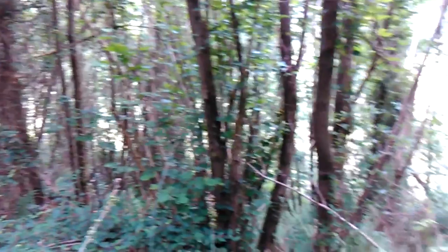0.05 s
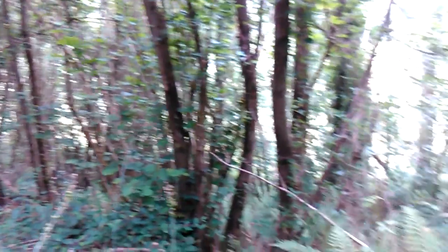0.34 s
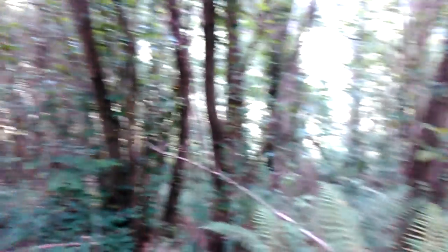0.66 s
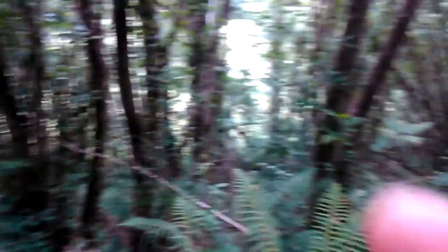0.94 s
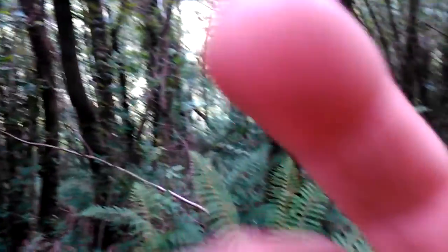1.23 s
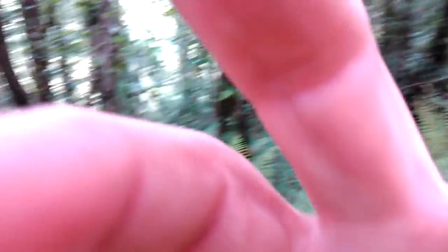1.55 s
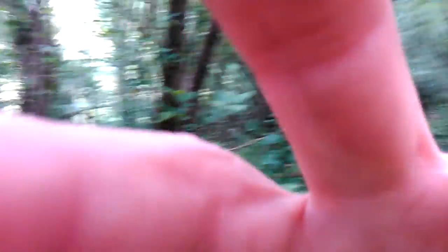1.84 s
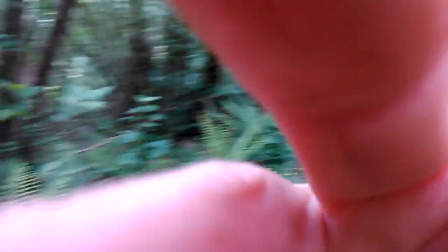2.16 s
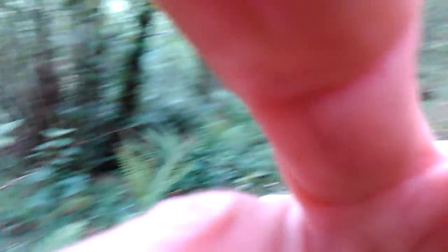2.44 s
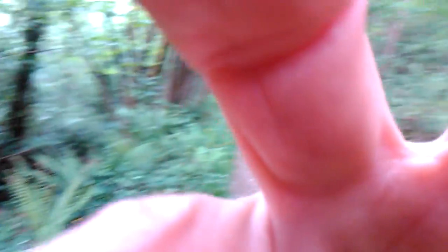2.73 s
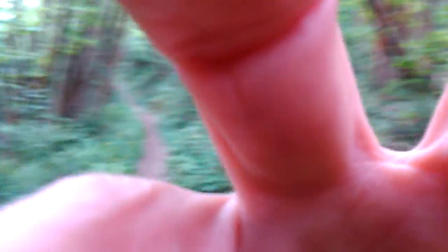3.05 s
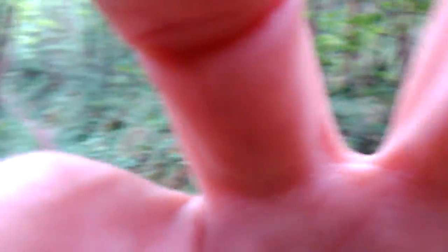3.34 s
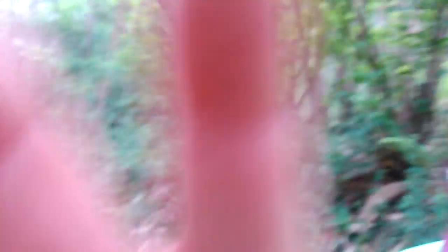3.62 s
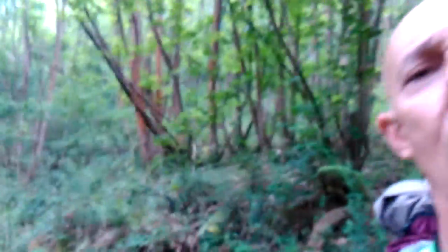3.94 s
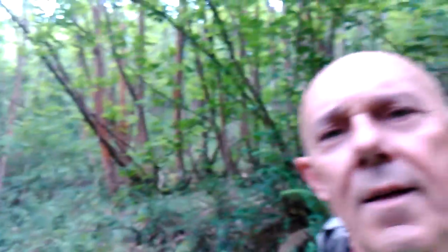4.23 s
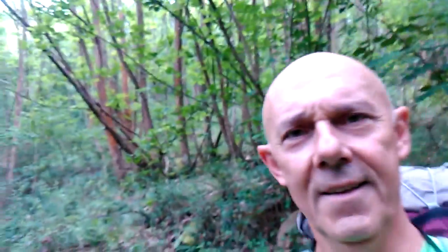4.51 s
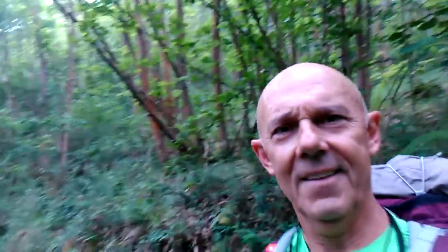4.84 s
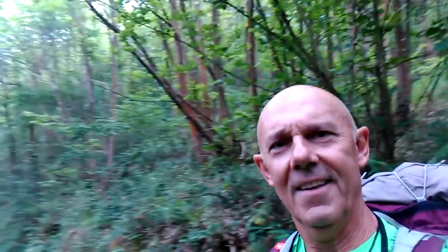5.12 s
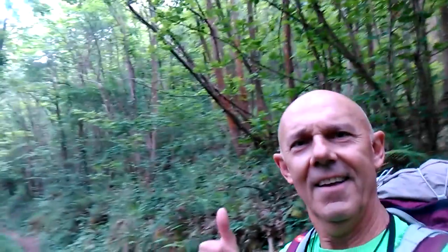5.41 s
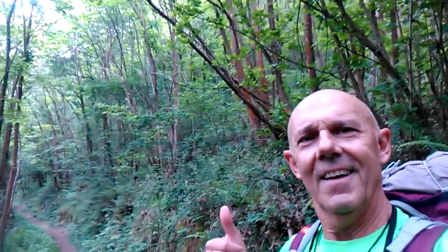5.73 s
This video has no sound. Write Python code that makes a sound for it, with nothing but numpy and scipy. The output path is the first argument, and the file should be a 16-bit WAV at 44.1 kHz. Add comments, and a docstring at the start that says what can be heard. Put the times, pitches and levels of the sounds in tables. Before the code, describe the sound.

In a quiet wood, a small camera is turned in the hand. Deep rumbling and soft thumps hit the microphone first, then uneven skin rubbing and plastic clicks that build to a short cluster of loud snaps. Behind this, birds chirp in thin, buzzy, gliding notes. As the handling fades to light touches, lower whistles come through a soft hush. A faint hum swells whenever the sound gets loud.

```python
"""In a wood where songbirds call, a small camera is turned round in the hand.
Right at the microphone, fingers rub and thump on its hollow plastic case, and the plastic clicks.
The birds sing gliding notes, high and buzzy or lower and clearer, that echo off the trees.
On loud sounds a noise suppressor opens: a faint hum comes up, and the hush of the wood lifts a little."""
import sys
import numpy as np
from scipy import signal
from scipy.fft import rfft, irfft
from scipy.io import wavfile
from scipy.ndimage import uniform_filter1d

SR = 44100
rng = np.random.default_rng(int(sys.argv[2]) if len(sys.argv) > 2 else 0)


def file_out(sig):
    """Save sig as 16-bit WAV at sys.argv[1]."""
    # one column per channel
    cols = np.atleast_2d(sig).T
    # limit, then scale
    lim = np.clip(cols, -1, 1)
    pcm = np.round(lim * 32767).astype(np.int16)
    wavfile.write(sys.argv[1], SR, pcm)


N = 258867
TIME, FREQS_HZ = np.arange(N) / SR, np.fft.rfftfreq(N, 1 / SR)
TREBLE_LIMIT_HZ = 16300


def finger_friction():
    """Skin drags on the case: a rumble, a rub and a hiss all follow one uneven finger pressure."""
    # finger strokes, with relative levels: start_s, length_s, rumble_db, rub_db, hiss_db
    strokes = [(0.209, 0.6, -26.5, -54, -88), (0.78, 0.25, -31.5, -61.5, -73.5),
               (0.945, 0.11, -44, -54.5, -66.5), (1.107, 0.048, -56, -57, -75),
               (1.208, 0.053, -50.5, -58.5, -73.5), (1.334, 0.08, -55, -60, -72),
               (1.436, 0.087, -46.5, -56.5, -72), (1.536, 0.081, -66, -61, -77),
               (1.684, 0.053, -43.5, -52, -62.5), (1.736, 0.028, -44, -35, -57),
               (1.831, 0.034, -44.5, -46, -62), (2.14, 0.066, -68, -79.5, -84.5),
               (2.322, 0.093, -30, -68.5, -112), (2.404, 0.082, -44, -51, -74),
               (2.532, 0.026, -50, -46, -65.5), (2.641, 0.074, -53, -58, -76.5),
               (2.737, 0.13, -43, -51, -67.5), (2.975, 0.013, -66, -47.5, -69),
               (3.059, 0.13, -37.5, -39.5, -56.5), (3.081, 0.031, -37, -31.5, -50),
               (3.13, 0.025, -30, -31, -53), (3.278, 0.048, -36, -49.5, -67.5),
               (3.328, 0.056, -42, -42, -50), (3.425, 0.045, -54.5, -53, -62),
               (3.493, 0.047, -65, -61.5, -72), (3.648, 0.05, -60, -57.5, -64.5),
               (3.716, 0.013, -43.5, -49, -61.5), (3.81, 0.03, -50, -63, -67.5),
               (3.924, 0.041, -51, -60.5, -65.5), (3.994, 0.12, -47, -60, -71.5),
               (4.227, 0.016, -59, -63, -79), (4.277, 0.099, -60, -71.5, -80),
               (5.079, 0.018, -53, -55.5, -81.5), (5.22, 0.079, -69, -68, -79),
               (5.41, 0.12, -72, -79.5, -93)]
    # the tone of each of the three parts: frequency_hz, level_db
    rumble_tone = [(20, -45), (35, -18.5), (55, 6.5), (100, -2), (160, -10.5), (250, -19), (400, -28),
                   (800, -41), (2000, -90.5)]
    rub_tone = [(80, -20), (200, 6), (430, 6.5), (600, -1.5), (850, 3.5), (1150, -3), (1400, -6.5),
                (2200, -11.5), (3200, -23.5), (6000, -28.5), (12000, -57)]
    hiss_tone = [(700, -40.5), (1800, 2), (3000, 6.5), (4200, 5.5), (5400, 9), (6800, 6.5), (9000, 7),
                 (12000, 2), (16000, 1)]
    lift_db_per_s = (430, 295.5, 209)  # as a finger lifts, the rumble dies first and the hiss last
    rumble_level, rub_level, hiss_level = (
        np.sqrt(sum(stroke_level(start, length, dbs[part], lift) ** 2 for start, length, *dbs in strokes))
        for part, lift in enumerate(lift_db_per_s))
    pressure = wander(43)
    contact = skin_slips(per_s=1500, spread_db=1.0, tick_share=0.25) * gain(1.9 * pressure)
    shaking = rng.standard_normal(N) * gain(pressure)
    rumble = gain(-3.0) * rumble_level * shape_tone(hollow_case(shaking), rumble_tone)
    rub = gain(-2.5) * rub_level * shape_tone(hollow_case(contact), rub_tone)
    hiss = gain(5.5) * hiss_level * shape_tone(contact, hiss_tone)
    return rumble + rub + hiss


def stroke_level(start_s, length_s, level_db, lift_db_per_s, press_s=0.015, ease_db_per_s=4):
    """The strength of one stroke: the finger presses down, eases as it slides, then lifts."""
    t = np.maximum(TIME - start_s, 0)
    fading_db = level_db - ease_db_per_s * t - lift_db_per_s * np.maximum(t - length_s, 0)
    return np.minimum(t / press_s, 1) * gain(np.maximum(fading_db, -200))


def skin_slips(per_s, spread_db, tick_share):
    """Skin sticks and slips, making tiny uneven ticks over a smooth sliding hiss."""
    ticks = rng.standard_normal(N) * (rng.random(N) < per_s / SR)
    ticks *= gain(spread_db * np.minimum(rng.exponential(1, N), 4))
    return np.sqrt(tick_share) * unit_level(ticks) + np.sqrt(1 - tick_share) * rng.standard_normal(N)


def hollow_case(sound):
    """The air and panels of the case boost certain pitches, so the rubbing sounds hollow."""
    # resonances of the case: pitch_hz, width_hz, boost_db
    resonances = [(214, 16, 11), (398.4, 62, 4), (628.4, 67, 8.5), (764, 82, 1.5), (1010, 79, 4),
                  (1330, 81, 4.5), (1504, 80, 8), (1790, 39, 1), (2360, 130, 5.5)]
    boost = 1 + sum((gain(db) - 1) / (1 + 2j * (FREQS_HZ - hz) / width) for hz, width, db in resonances)
    return irfft(rfft(sound) * boost, N)


def finger_thumps(rise_cycles=0.42):
    """Each soft blow bends the case, which swings back within a cycle or two."""
    # blows of the fingers: start_s, level_db, pitch_hz
    blows = [(0.243, -13.5, 77), (0.247, -19, 213), (0.265, -21.5, 163), (0.416, -11.5, 92),
             (0.422, -17, 241), (0.48, -12.5, 87), (0.556, -15, 96.5), (0.574, -22, 157), (0.599, -20, 93),
             (0.628, -14.5, 58.5), (0.687, -23.5, 79.6), (0.734, -12, 132), (0.76, -12, 211),
             (0.864, -14.5, 107), (0.880, -18, 108), (0.914, -22, 92.6), (0.998, -21.5, 55),
             (1.696, -33.5, 244), (1.749, -26.5, 464), (1.76, -21.5, 460), (1.7624, -21, 340),
             (1.8394, -23, 450), (2.328, -24, 64), (2.349, -18.5, 99), (2.371, -22, 193), (2.416, -24, 48),
             (2.531, -23.5, 334), (2.534, -30, 84.5), (2.743, -39.5, 99), (2.796, -34, 55),
             (3.149, -25, 61), (3.206, -29.5, 417), (3.66, -38, 63.4), (5.084, -44.5, 124),
             (5.087, -38.5, 354)]
    out, t = np.zeros(N), np.arange(SR // 8) / SR
    for start_s, level_db, pitch_hz in blows:
        rise = t * pitch_hz / rise_cycles
        swell = (rise * np.exp(1 - rise)) ** 1.55
        add(out, start_s, gain(level_db) * swell * np.sin(2 * np.pi * pitch_hz * t))
    return out


def plastic_clicks(rattle_db=-24.0, rattle_s=0.0045, tick_low_hz=6000, lag_s=0.0003):
    """A short push makes a tick, then the case knocks and rings; loose parts rattle briefly."""
    # sharp snaps of the plastic: start_s, knock_db, ring_db, tick_db, tick_top_hz
    snaps = [(1.702, -60, -63, -30, 9700), (1.7052, -53, -46.5, -30.5, 9550),
             (1.7305, -52, -30, -31, 10900), (1.7488, -36, -22, -56, 10000), (1.7595, -18, -25, -35, 8860),
             (1.762, -44, -20, -57, 9400), (1.839, -19.5, -22.5, -43, 12000),
             (2.532, -21, -24.5, -20, 15700), (2.744, -35.5, -33, -49, 12000),
             (2.988, -37.5, -60, -55, 10000), (3.0828, -34, -14, -37, 8700),
             (3.149, -19.5, -42, -46, 12060), (3.211, -51, -32.5, -48, 14100),
             (3.29, -56, -37.5, -55.5, 10000), (3.3426, -38, -13, -29, 15000),
             (3.365, -39.5, -17, -17, 15940), (3.3692, -15.5, -11, -22, 15000),
             (3.668, -50, -30, -26, 15900), (3.7266, -33.5, -53, -30, 16000)]
    # how the hollow shell and the small stiff parts ring: pitch_hz, width_hz, level_db
    shell_tones = [(810, 200, -5.5), (1350, 550, -2.5), (2163, 1300, 0)]
    small_part_tones = [(2985, 1800, 10), (4180, 63, -33), (4730, 940, 5.5), (5300, 1700, -20.5)]
    out, t = np.zeros(N), np.arange(SR // 24) / SR
    late = np.maximum(t - lag_s, 0)  # the bend needs a moment to cross the case
    knock, ring = ringing(shell_tones, late), -ringing(small_part_tones, late)
    pulse = t == 0
    for start_s, *levels_db, top_hz in snaps + settling_snaps():
        band_hz = [tick_low_hz, np.clip(top_hz, tick_low_hz + 1000, TREBLE_LIMIT_HZ)]
        tick = signal.lfilter(*signal.butter(2, band_hz, "band", fs=SR), pulse)
        snap = sum(gain(db) * part / abs(part).max() for db, part in zip(levels_db, (knock, ring, tick)))
        rattle = gain(rattle_db) * np.exp(-t / rattle_s) * rng.standard_normal(len(t))
        add(out, start_s, signal.fftconvolve(pulse + rattle, snap))
    return out


def ringing(tones, t):
    """Struck plastic rings at several pitches; the wider a resonance, the faster it dies."""
    return sum(gain(db) * np.exp(-np.pi * width * t) * np.sin(2 * np.pi * hz * t)
               for hz, width, db in tones)


def settling_snaps(start_s=3.374, length_s=0.11, per_s=75, fade_db_per_s=117, spread_db=3):
    """After the hardest snap the case settles in an uneven, dying run of small ones."""
    knock_db, ring_db, tick_db, tick_top_hz = -37, -23, -35, 14498
    timing, strength = rng.random((40, 2)).T
    delays_s = (np.arange(len(timing)) + timing) / per_s
    drops_db = fade_db_per_s * delays_s + spread_db * (2 * strength - 1)
    return [(start_s + delay, knock_db - drop, ring_db - drop, tick_db - drop, tick_top_hz)
            for delay, drop in zip(delays_s, drops_db) if delay < length_s]


def songbirds(trill_hz=420, flutter_db=2):
    """Each note is a gliding whistle; a fast, uneven trill makes it buzz, and its strength flutters."""
    # thin high notes and lower whistles: start_s, length_s, start_hz, end_hz, relative_db, buzz_hz
    chirps = [(0.0, 0.075, 7300, 7410, -77.5, 35), (0.071, 0.045, 6340, 4700, -77.5, 120),
              (0.208, 0.055, 7060, 6510, -54.5, 290), (0.296, 0.053, 5720, 4510, -60, 287),
              (0.372, 0.13, 7240, 6554, -53, 125), (0.544, 0.089, 7120, 7650, -54.5, 129),
              (0.631, 0.081, 6000, 5220, -64.5, 151), (0.643, 0.14, 7560, 7340, -57.5, 219),
              (0.795, 0.061, 7620, 7270, -52, 167), (0.928, 0.12, 7480, 7350, -54.5, 150),
              (1.057, 0.062, 5320, 5220, -61, 51.3), (1.106, 0.037, 5190, 4850, -50.5, 49.7),
              (1.206, 0.04, 6140, 5890, -51.5, 181), (1.31, 0.55, 7440, 7630, -77, 96),
              (1.878, 0.095, 7620, 6810, -64.5, 54.3), (2.741, 0.11, 7280, 7100, -59, 373),
              (2.861, 0.023, 5910, 4750, -56, 355), (2.959, 0.097, 5300, 5300, -67.5, 467),
              (3.068, 0.49, 5110, 4854, -59.5, 513), (3.613, 0.053, 6600, 6560, -66, 150),
              (3.653, 0.1, 6540, 7180, -54.5, 201)]
    whistles = [(0.328, 0.27, 2992, 2982, -69, 51), (0.885, 0.25, 3030, 2960, -73, 50),
                (1.604, 0.1, 2470, 2510, -75.5, 39), (3.824, 0.032, 3600, 3460, -57.5, 22),
                (3.854, 0.17, 4980, 4970, -64.5, 39), (3.892, 0.047, 2580, 2970, -67.5, 50),
                (3.957, 0.12, 4660, 4090, -61, 210), (3.994, 0.102, 3840, 3317, -52, 26),
                (4.211, 0.061, 3270, 2960, -68, 43), (4.243, 0.15, 2576, 2813, -79.5, 39),
                (4.338, 0.086, 2300, 2412, -68.5, 23), (4.464, 0.12, 3146, 3140, -75.5, 40),
                (4.687, 0.047, 2315, 2170, -80.5, 17), (4.917, 0.07, 2540, 2946, -70.5, 37),
                (4.995, 0.036, 2836, 2870, -67.5, 17), (5.083, 0.024, 2830, 2823, -61.5, 31),
                (5.174, 0.12, 3460, 3220, -66.5, 60), (5.229, 0.034, 3050, 2340, -64, 170),
                (5.393, 0.16, 3686, 3095, -69.5, 112)]
    # repeated high notes: start_s, until_s, every_s, length_s, start_hz, end_hz, relative_db, buzz_hz
    runs = [(0.51, 0.96, 0.179, 0.075, 4657, 5110, -59, 207),
            (1.336, 1.8, 0.103, 0.061, 5897, 5780, -52.5, 91)]
    out, trill = np.zeros(N), wander(trill_hz)
    repeats = [(s, *note) for start, until, every, *note in runs for s in np.arange(start, until, every)]
    for start_s, length_s, start_hz, end_hz, relative_db, buzz_hz in chirps + repeats + whistles:
        glide = np.linspace(0, 1, int(length_s * SR)) ** 0.72  # moves fastest at the start
        buzz = buzz_hz * np.roll(trill, -int(start_s * SR))[:len(glide)]
        pitch_hz = start_hz + (end_hz - start_hz) * glide + buzz
        swell = gain(relative_db + 3.5) * signal.windows.tukey(len(glide), 0.3)
        add(out, start_s, swell * np.sin(2 * np.pi * np.cumsum(pitch_hz) / SR))
    return out * gain(flutter_db * wander(60))


def tree_echoes(sound, tail_s=0.56, tail_db=-6.0, leaves_s=0.17, leaves_db=-2):
    """Near trunks send single echoes, leaves blur each note, and far trees scatter a soft tail."""
    # echoes off near trunks: delay_s, level_db
    trunks = [(0.033, -11), (0.057, -23)]
    t = np.arange(SR) / SR
    tail, blur = (rng.standard_normal(SR) * gain(-60 * t / fade_s) for fade_s in (tail_s, leaves_s))
    echoes = gain(tail_db) * tail / np.linalg.norm(tail) + gain(leaves_db) * blur / np.linalg.norm(blur)
    echoes[0] += 0.8  # the sound that arrives directly
    for delay_s, level_db in trunks:
        add(echoes, delay_s, gain([level_db]))
    return signal.fftconvolve(sound, echoes)[:N]


def suppressor_opening(sound, threshold_db=-62, range_db=21, slope=0.99, release_db_per_s=240):
    """How far the noise suppressor opens, in dB: quickly on loud sound, shutting more slowly."""
    power_db = 10 * np.log10(abs(uniform_filter1d(sound ** 2, size=600)) + 1e-12)
    fall_db = TIME * release_db_per_s
    held_db = np.maximum.accumulate(power_db + fall_db) - fall_db
    open_db = np.clip(slope * (held_db - threshold_db), 0, range_db)
    return uniform_filter1d(open_db, size=600)


def faint_hum(waver=0.0037):
    """A low hum wavers in pitch; each of its tones swells and fades on its own."""
    # tones of the hum with the suppressor shut: pitch_hz, level_db
    tones = [(52, -81.5), (103, -79.5), (207, -81.5), (310, -82.5), (413, -81.5), (515, -91.5), (620, -86)]
    clock = np.cumsum(1 + waver * wander(2.47)) / SR
    return sum(np.sqrt(2) * gain(db + 2.5 * wander(3.5)) * np.sin(2 * np.pi * (hz * clock + rng.random()))
               for hz, db in tones)


def wood_hush(level_db=-72.5, flicker_db=0.64):
    """The hush of the wood is a soft, deep noise whose level flickers slightly."""
    # the tone of the hush: frequency_hz, level_db
    hush_tone = [(15, -49), (25, 1), (108, -8), (263, -7), (405, -10.5), (451, -11.5), (962, -14),
                 (1100, -21), (2160, -23.5), (4870, -34.5), (12200, -34.5), (16000, -45)]
    return gain(level_db + flicker_db * wander(25)) * shape_tone(rng.standard_normal(N), hush_tone)


def gain(db):
    """Turns decibels into a multiplier."""
    return 10 ** (np.asarray(db) / 20)


def unit_level(sound):
    """Scales a sound to an average (rms) level of 1."""
    return sound / np.sqrt(np.mean(sound ** 2) + 1e-20)


def add(mix, start_s, sound):
    """Mixes a sound in at its start time."""
    part = mix[max(round(start_s * SR), 0):][:len(sound)]
    part += sound[:len(part)]


def shape_tone(sound, points):
    """Filters a sound by a curve through (frequency_hz, level_db) points, then scales it to level 1."""
    hz, db = np.transpose(points)
    curve_db = np.interp(np.log(FREQS_HZ + 1), np.log(hz), db)
    return unit_level(irfft(rfft(sound) * gain(curve_db), N))


def wander(rate_hz):
    """A smooth random drift of level 1, no faster than about rate_hz."""
    return unit_level(irfft(rfft(rng.standard_normal(N)) * np.exp(-(FREQS_HZ / rate_hz) ** 2), N))


def scene():
    """Handling noise and birds, over a background that rises with them."""
    foreground = finger_friction() + finger_thumps() + plastic_clicks() + tree_echoes(songbirds())
    open_db = suppressor_opening(foreground)
    hush = wood_hush() * gain(0.074 * open_db)
    hum = faint_hum() * gain(open_db)
    return (foreground + hum + hush)[None]


def record(dry, bass_hz=41):
    """The microphone loses the deepest bass, then the highest treble is cut."""
    thinned = signal.sosfilt(signal.butter(4, bass_hz, "high", fs=SR, output="sos"), dry)
    treble_cut = signal.firwin(301, TREBLE_LIMIT_HZ, window=("kaiser", 8), fs=SR)
    return signal.oaconvolve(thinned, treble_cut[None], "same")


dry = scene()
out = record(dry)
file_out(out)
```